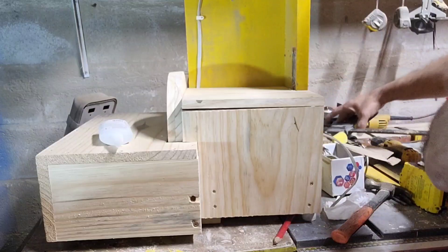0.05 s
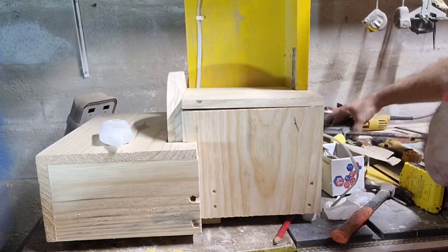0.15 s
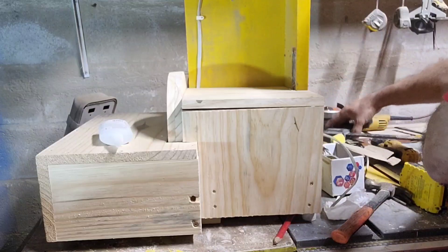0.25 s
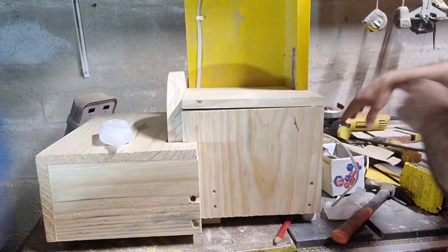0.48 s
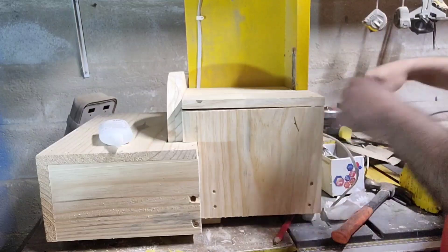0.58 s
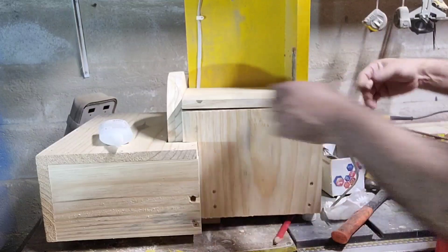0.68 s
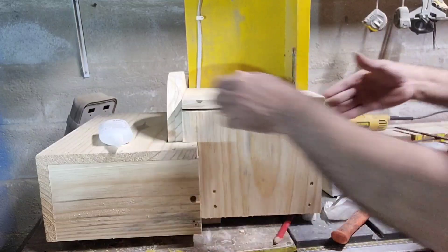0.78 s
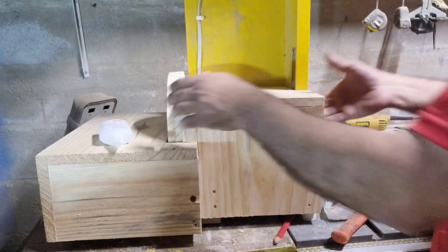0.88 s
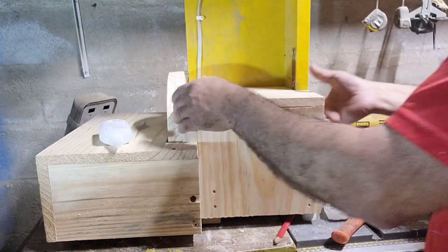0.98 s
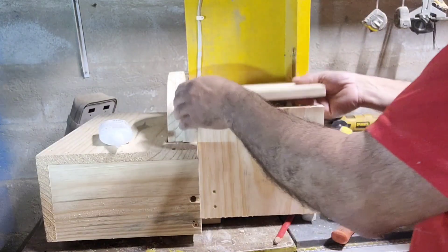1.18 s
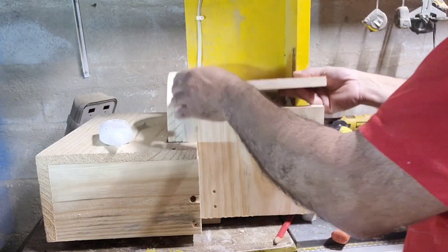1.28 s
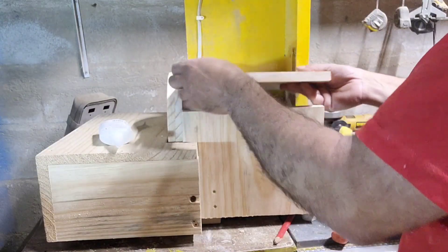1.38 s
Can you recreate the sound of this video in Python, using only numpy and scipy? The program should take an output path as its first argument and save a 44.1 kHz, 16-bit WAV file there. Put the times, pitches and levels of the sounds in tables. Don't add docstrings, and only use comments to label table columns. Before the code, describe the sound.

Wood and tool knocks clatter on a bench, one sharp and loud, then a hollow box judders softly

```python
import sys
import numpy as np
from scipy import signal
from scipy.fft import rfft, irfft, next_fast_len
from scipy.io import wavfile
from scipy.ndimage import uniform_filter1d

SR = 44100
rng = np.random.default_rng(int(sys.argv[2]) if len(sys.argv) > 2 else 0)


def dump(signal):
    limited = np.clip(np.atleast_2d(signal).T, -1, 1)
    pcm = np.round(limited * 32767).astype(np.int16)
    wavfile.write(sys.argv[1], SR, pcm)


def how_loud(loudness_db):
    steps = np.asarray(loudness_db, float) / 20
    return 10 ** steps


N = 63945

# f/Hz, left-right correlation
ROOM_LIKENESS = [(100, 0.91), (400, 0.97), (800, 0.17), (4000, 0.91)]
SPOT_DB = 2.5
DROP_S = .3648


def unit(x):
    return x / np.sqrt(np.mean(x ** 2) + 1e-20)


def along(points, hz):
    f, v = np.transpose(points)
    return np.interp(np.log(hz + 1), np.log(f + 1), v)


def body(modes, f, where_db=0):
    gains = how_loud(where_db * rng.standard_normal(len(modes)))
    total = 0
    for k, (center, width, db) in enumerate(modes):
        resonance = 1j * f * width / (center * center - f * f + 1j * f * width)
        total = total + (-1) ** k * gains[k] * how_loud(db) * resonance
    return total


def filtered(x, response):
    m = next_fast_len(x.shape[-1] + SR // 8)
    return irfft(rfft(x, m) * response(np.fft.rfftfreq(m, 1 / SR)), m)[..., :x.shape[-1]]


def pair(noise):
    def shares(hz):
        turn = np.arccos(np.clip(along(ROOM_LIKENESS, hz), -1, 1)) / 2
        return np.array([np.cos(turn), np.sin(turn)])

    mid, side = filtered(noise, shares)
    return np.array([mid + side, mid - side])


def room(x, wet_db):
    # f/Hz, t60/s
    decay = [(80, 0.99), (250, 0.31), (1000, 0.38), (4000, 0.35), (9000, 0.24), (15000, 0.23)]
    shadow_hz = 3360
    hz, t, z = signal.stft(rng.standard_normal((2, SR // 2)), SR, nperseg=256)
    turn = np.arccos(np.clip(along(ROOM_LIKENESS, hz), -1, 1))[:, None] / 2
    mid, side = z[0] * np.cos(turn), z[1] * np.sin(turn)
    fade = how_loud(-60 * t / along(decay, hz)[:, None])
    tail = signal.istft(np.array([mid + side, mid - side]) * fade, SR, nperseg=256)[1]
    tail *= np.clip(np.arange(tail.shape[1]) / (0.0041 * SR), 0, 1)
    wet = how_loud(wet_db) * signal.fftconvolve(x[None], tail / np.linalg.norm(tail[0]), axes=1)
    direct = filtered(x, lambda f: 1 / (1 + 1j * f / shadow_hz))
    return wet + np.pad(direct, (0, wet.shape[1] - len(x)))


def add(out, s, x):
    seat = out[:, max(round(s * SR), 0):][:, :x.shape[1]]
    seat += x[:, :seat.shape[1]]


def blow(hard_hz, response):
    t = np.arange(SR // 5) / SR
    u = 2 * np.pi * hard_hz * t
    return filtered(u * np.exp(1 - u), response)


def knock(db, hard_hz, bench_db, piece, spot_db):
    # f/Hz, width/Hz, level/dB
    bench_modes = [(62.5, 6.6, -12.5), (108.6, 15, -7), (147.4, 2, 1), (183.2, 24, -5), (212.4, 79, -7),
                   (272.5, 26, -1), (410, 42, -9.5), (500, 11, -5)]

    def response(f):
        bench = 14 * how_loud(bench_db) * np.sqrt(hard_hz / 900) * body(bench_modes, f, spot_db)
        return (5 * body(piece, f, spot_db) + bench) / (1 + .6j * f / hard_hz)

    return how_loud(db) * blow(hard_hz, response)


def knocks():
    # t/s, strength/dB, hardness/Hz, bench share/dB
    contacts = [(.001, -35.5, 2700, 4.5), (0.011, -42.5, 500, 0), (0.037, -45, 890, 2.5),
                (0.058, -52.5, 925, -2.5), (0.129, -48.5, 2000, -3), (0.1974, -30.5, 1200, 1),
                (0.218, -34, 300, -13), (0.256, -47, 300, 5.5), (0.284, -42.5, 219, 7),
                (0.3, -26.5, 1800, 0), (0.311, -29, 300, -4), (0.344, -29, 423, -4),
                (.373, -15.5, 1200, -10), (.392, -35.5, 900, 4), (.440, -32.5, 500, -4),
                (.478, -35.5, 300, -1.5), (0.559, -36, 3000, -7.5), (.592, -40.5, 2000, 1.5),
                (0.623, -54.5, 500, 3.5), (0.658, -70, 300, -12.5), (.710, -69, 300, -6),
                (0.781, -66, 602, 16)]
    # f/Hz, width/Hz, level/dB
    offcut = [(620, 250, -3.5), (1050, 390, -3.5), (1540, 460, -1.5), (2140, 490, -1.5), (2555, 390, -3.5),
              (4770, 830, -5.5)]
    # f/Hz, width/Hz, level/dB
    tool = [(797, 470, 5), (1012, 610, 8), (1410, 360, 9), (1690, 1200, 2.5), (2324, 290, 6),
            (2920, 1300, 1), (4930, 6300, 2), (7250, 820, 10.5), (12060, 2500, 6)]
    out = np.zeros((2, N))
    dropped = knock(-6.5, 4320, -23, tool, 0)
    add(out, DROP_S, room(dropped, 2.5))
    for s, db, hard_hz, bench_db in contacts:
        add(out, s, room(knock(db, hard_hz, bench_db, offcut, SPOT_DB), 4.5))
    return out


def rub():
    # t/s, level/dB
    grip = [(0.808, -76), (0.818, -59.5), (0.83, -54.5), (0.905, -55), (0.998, -68), (1.036, -102.5),
            (1.06, -105.5)]
    lift = [(1.13, -68), (1.136, -76), (1.171, -67.5), (1.18, -60.5), (1.229, -69.5), (1.284, -112),
            (1.29, -75.5), (1.358, -93)]
    slide = [(1.36, -101), (1.364, -79.5), (1.387, -54.5), (1.411, -57.5), (1.45, -52.5)]
    # t/s, level/dB
    shuffle = [(0, -59), (0.121, -72), (.3, -69.5), (.535, -74.5), (.562, -49), (.578, -69), (0.59, -59.5),
               (0.658, -85)]
    # t/s, level/dB
    brush = [(1.066, -100), (1.08, -72.5), (1.115, -73), (1.13, -100)]
    # f/Hz, width/Hz, level/dB
    front = [(378, 130, 8), (980, 570, -4.5), (1873, 420, -8.5), (2563, 180, -5), (3393, 150, -8),
             (4240, 190, -9.5), (4600, 300, -15.5), (5140, 170, -14), (5980, 480, -13.5),
             (7660, 500, -18.5), (10900, 900, -20.5)]
    lid = [(372, 100, 8.5), (755, 100, 8.5), (1328, 1100, 0), (1790, 240, 4), (2230, 170, -4.5),
           (3240, 220, -1), (4130, 460, -2.5), (5690, 270, -4.5), (6380, 670, -9.5), (7950, 390, -17),
           (9510, 870, -14)]
    edge = [(535, 17, 9.5), (1370, 120, -2.5), (2240, 590, -16.5), (3240, 160, -4.5), (4170, 253, -6),
            (5810, 930, -15.5), (12140, 2700, -21.5)]
    scraps = [(1478, 1200, -11), (5070, 3400, -12.5), (12700, 1900, -15.5)]
    nail = [(740, 1300, 6), (4474, 140, 15)]
    stroke_db = [4.5, 11.6, 6.9, 7.7, 2.9]
    grains_per_s, grain_spread_db = 5000, 2
    strokes, pieces = [grip, lift, slide, shuffle, brush], [front, lid, edge, scraps, nail]
    dry = np.zeros(N)
    for stroke, piece, gain_db in zip(strokes, pieces, stroke_db):
        s, db = np.transpose(stroke)
        chance = rng.random(N)
        size = rng.standard_normal(N) * how_loud(grain_spread_db * rng.exponential(size=N))
        grains = size * (chance < grains_per_s / SR)
        sound = unit(filtered(grains, lambda f: body(piece, f)))
        pressure_db = np.interp(np.arange(N) / SR, s, db, left=-140, right=-140)
        dry = dry + sound * how_loud(gain_db + pressure_db)
    return room(dry, -7)[:, :N]


def ticks():
    # t/s, f/Hz, level/dB, length/s
    scratches = [
        (.818, 10900, -65, 0.019),
        (.82, 7200, -71.5, 0.021),
        (.885, 5500, -70, .02),
        (0.49, 2000, -58, .03),
        (0, 2600, -64, 0.055),
        (1.07, 10500, -79.5, 0.074),
        (1.15, 10100, -73, 0.027),
        (1.42, 11000, -67, 0.033),
    ]
    out = np.zeros((2, N))
    t = np.arange(SR // 10) / SR
    for s, hz, db, long_s in scratches:
        noise = rng.standard_normal(len(t))
        scratch = unit(filtered(noise, lambda f: body([(hz, hz / 14, 0)], f) ** 2))
        swell = np.sin(np.pi * np.clip(t / long_s, 0, 1)) ** 2
        add(out, s, how_loud(db) * scratch[None] * swell)
    return out


def rings():
    # t/s, f/Hz, level/dB, t60/s
    drop_rings = [(.3646, 2226, -9.5, .04), (.3646, 1300, -18, 0.053), (.372, 913, -15, .05),
                  (.366, 721, -25.5, .09), (.367, 1017, -25.5, 0.055), (.367, 1115, -25, 0.04),
                  (.368, 1272, -22, 0.075), (.368, 1370, -24, 0.045), (.38, 658, -29.5, 0.26),
                  (.2985, 588, -30, .04), (.2985, 1705, -32.5, .04), (.2985, 2200, -32, .04),
                  (.2985, 2750, -33, 0.032), (.302, 1080, -34.5, .06), (.306, 800, -33, .1),
                  (.1972, 500, -27.5, 0.052), (0.1971, 1662, -40, 0.051), (.593, 520, -40, 0.092)]
    # t/s, f/Hz, level/dB, t60/s
    board_rings = [(.372, 111.3, -41.5, .7), (.45, 148.8, -36.5, 0.83), (0.692, 112, -51, 0.32),
                   (0.799, 114.7, -49, 0.77), (.814, 250, -36, 0.18), (.830, 275.6, -32.5, 0.19),
                   (.822, 530.4, -25.5, .14), (.843, 487, -33, 0.057), (.848, 362, -29.5, 0.1),
                   (.864, 642.2, -35.5, 0.2), (.885, 476, -33.5, 0.072), (1.132, 413, -35.5, 0.054),
                   (1.14, 300, -41.5, 0.093), (1.176, 383.6, -41, 0.18), (1.178, 776, -45.5, 0.21),
                   (1.20, 349, -49, 0.082), (1.384, 381.2, -33, 0.22), (1.392, 560.6, -38.5, 0.26),
                   (1.41, 561.3, -43.5, 0.08), (1.42, 339.7, -35, 0.091), (1.385, 1366, -47.5, 0.085),
                   (1.429, 1333, -51, 0.12), (1.436, 1630, -44.5, .1)]
    wet_levels = [-14, -9]
    rises_s = [.0008, 0.0043]
    snap_db, snap_t60_s = -17.5, .012
    out = np.zeros((2, N))
    t = np.arange(SR // 5) / SR
    for modes, rise_s, wet_db in zip([drop_rings, board_rings], rises_s, wet_levels):
        dry = np.zeros((1, N))
        for s, hz, db, t60 in modes:
            envelope = how_loud(db - 60 * t[None] / t60) * (1 - np.exp(-t / rise_s))
            add(dry, s, envelope * np.sin(2 * np.pi * hz * t))
        out = out + room(dry[0], wet_db)[:, :N]
    snap = pair(rng.standard_normal((2, len(t))))
    add(out, DROP_S, how_loud(snap_db - 60 * t / snap_t60_s) * snap)
    return out


def squeak():
    start_hz, fall_hz, long_s = 1530, 300, .024
    u = np.arange(round(long_s * SR)) / (long_s * SR)
    phase = 2 * np.pi * np.cumsum(start_hz - fall_hz * u) / SR
    tone = np.sin(np.pi * u) ** 2 * np.sin(phase)
    out = np.zeros((2, N))
    add(out, .551, room(how_loud(-39.5) * tone, -12.5))
    return out


def jolts():
    # t/s, strength/dB, f/Hz
    pushes = [(0.797, -47.5, 196.5), (.817, -34, 258), (.825, -35, 430), (.829, -24, 520),
              (0.833, -43, 300), (.841, -34, 430), (.849, -28.5, 420), (.858, -30, 500), (.870, -32, 665),
              (.891, -29.5, 502), (0.921, -50, 500), (.945, -47.5, 300), (1.133, -28, 444),
              (1.141, -28.5, 435), (1.153, -45.5, 300), (1.164, -42.5, 410), (1.18, -52.5, 424),
              (1.190, -39, 412), (1.202, -47.5, 375), (1.217, -46.5, 404), (1.228, -44.5, 400),
              (1.292, -56, 406.5), (1.387, -49, 358), (1.393, -31, 420), (1.404, -35.5, 470),
              (1.416, -35, 560), (1.428, -47, 405.2), (1.442, -40, 338)]
    # f/Hz, width/Hz, level/dB
    box = [(250, 33, 6.5), (286, 16, -2), (375.7, 18, -7.5), (518, 18, -1.5), (520, 19.7, 2), (613, 77, 1),
           (776, 190, -2), (987, 120, -45)]
    push_q, box_ring_db = 1.4, 0
    out = np.zeros((2, N))
    for s, db, hz in pushes:
        def response(f):
            push = body([(hz, hz / push_q, 0)], f) ** 3
            return push * (1 + how_loud(box_ring_db) * body(box, f, SPOT_DB))

        add(out, s, room(how_loud(db) * 4 * blow(hz, response), -7))
    return out


def scene():
    return knocks() + rub() + ticks() + rings() + squeak() + jolts()


def band_limit(x):
    return signal.sosfilt(signal.butter(12, 16530, fs=SR, output="sos"), x)


def record(dry):
    # f/Hz, left over right/dB
    muffle = [(60, -2), (290, -2), (640, 0.5), (1410, 3.5), (3100, 11), (4600, 24), (7500, 38.5),
              (15000, 13)]
    # f/Hz, density/dB
    hiss_shape = [(24, -50.5), (40, -20.5), (168, 0.5), (258, -30.5), (862, -27), (3270, -55),
                  (8600, -55.5), (12000, -48.5), (15700, -47.5), (15950, -85.5)]
    left_lag_s, low_cut_hz, top_hz = 6e-5, 29, 15850
    hiss_db, steady_db = -68, -1
    gate_follows, gate_shut_db, gate_open_db = 0.64, -61.5, -33.5
    gate_n = round(0.03 * SR)

    right = np.array([[0], [1]])

    def port(hz):
        lag = np.exp(-2j * np.pi * hz * left_lag_s * (1 - right))
        return how_loud(-along(muffle, hz) * right) * lag

    ports = filtered(dry, port)

    power = np.abs(uniform_filter1d(dry[0] ** 2, gate_n, origin=gate_n // 2 - 1))
    level_db = 10 * np.log10(power + 1e-12)
    gate_db = gate_follows * (np.clip(level_db, gate_shut_db, gate_open_db) - gate_shut_db)
    gate_db = uniform_filter1d(gate_db, gate_n)
    hiss = unit(filtered(pair(rng.standard_normal((2, N))), lambda hz: how_loud(along(hiss_shape, hz))))

    def steady_band(hz):
        return how_loud(hiss_db - 16 + steady_db) * (hz > 4000) * (hz < 15800)

    steady = filtered(rng.standard_normal((2, N)), steady_band)

    def band(hz):
        return (1j * hz / (low_cut_hz + 1j * hz)) ** 4 * (hz < top_hz)

    return band_limit(filtered(ports + hiss * how_loud(hiss_db + gate_db) + steady, band))


dry = scene()
out = record(dry)
dump(out)
```